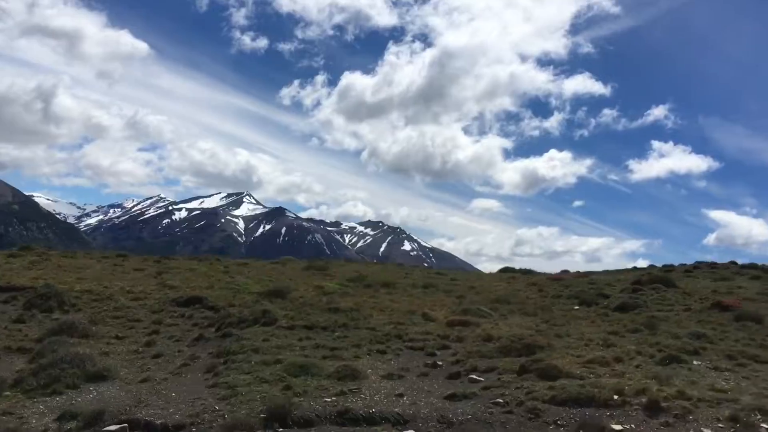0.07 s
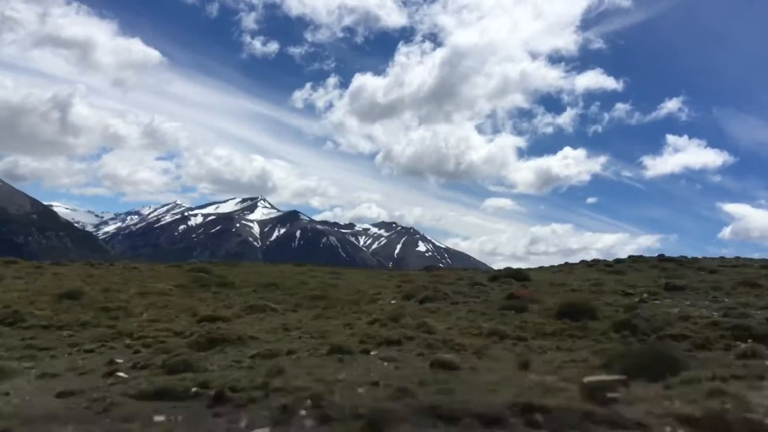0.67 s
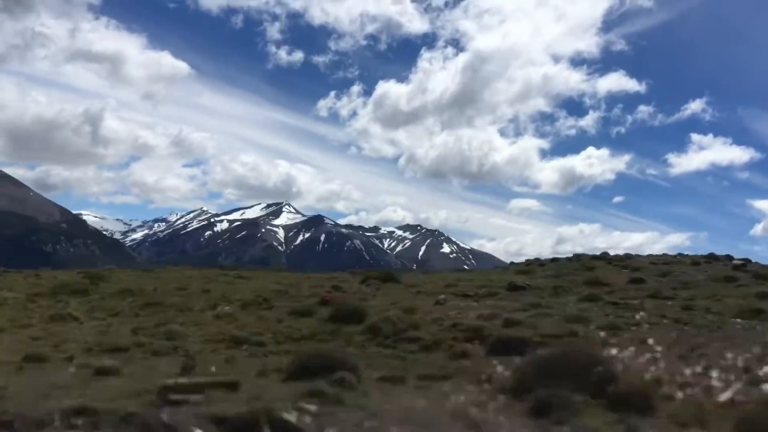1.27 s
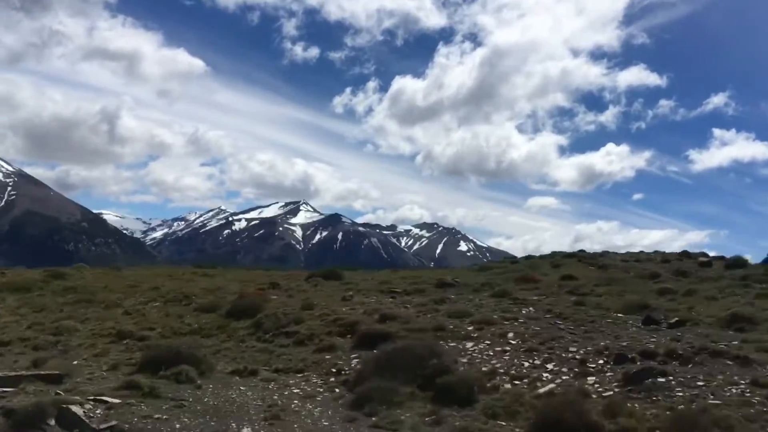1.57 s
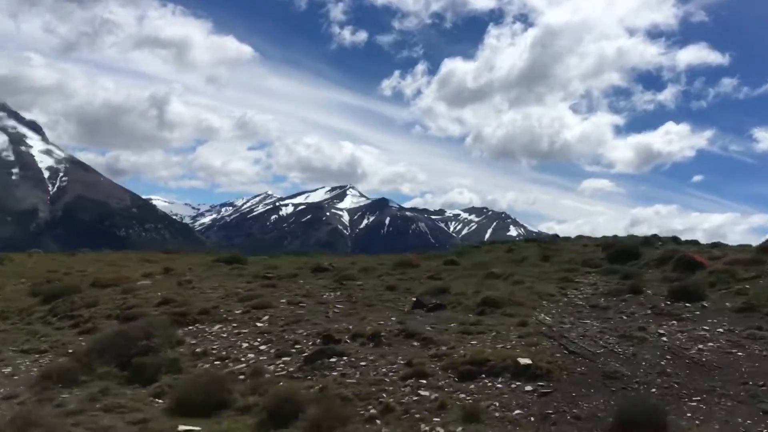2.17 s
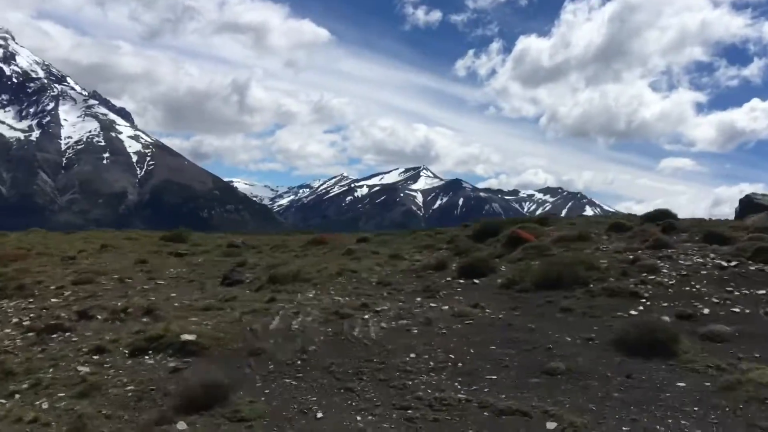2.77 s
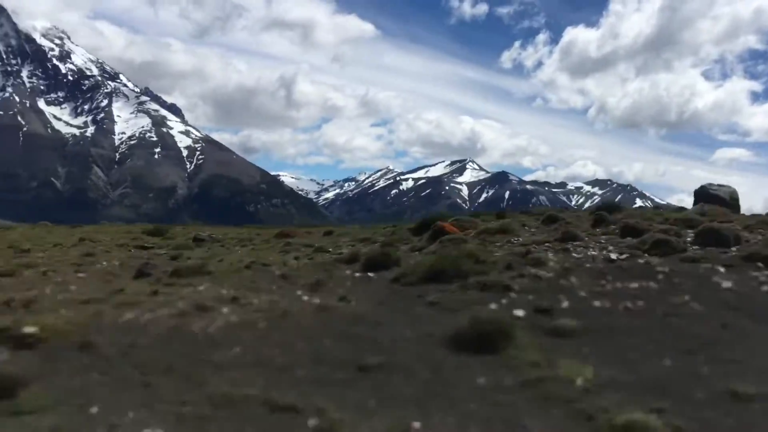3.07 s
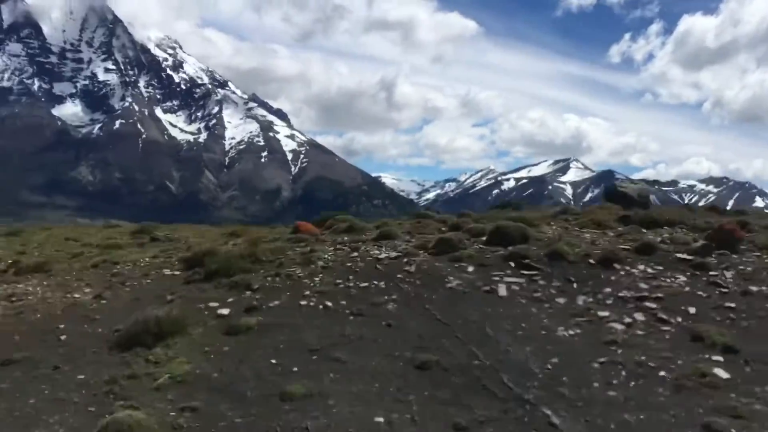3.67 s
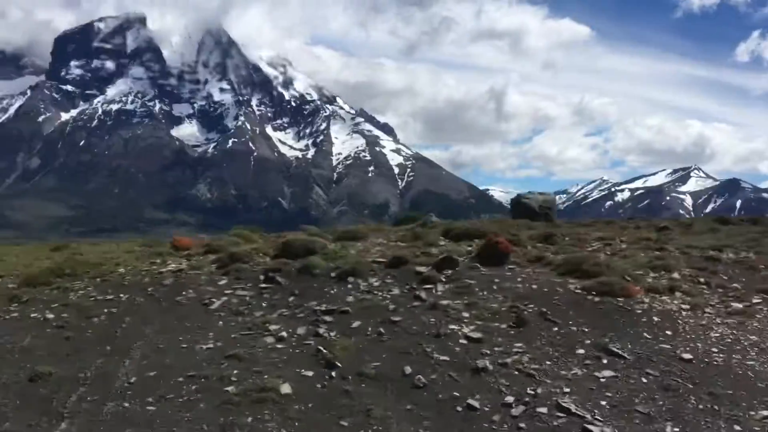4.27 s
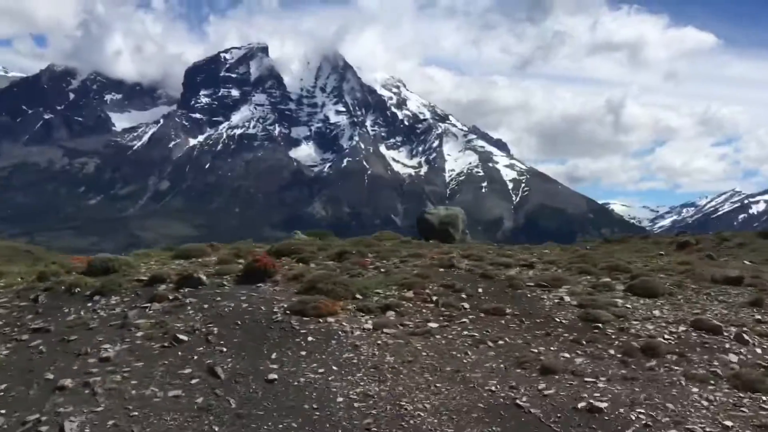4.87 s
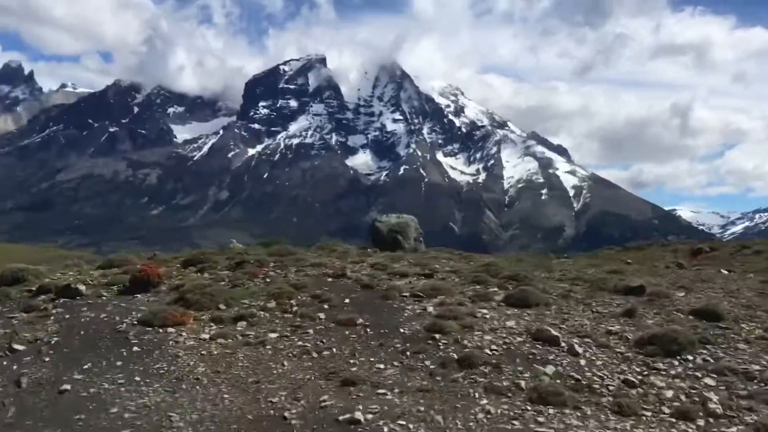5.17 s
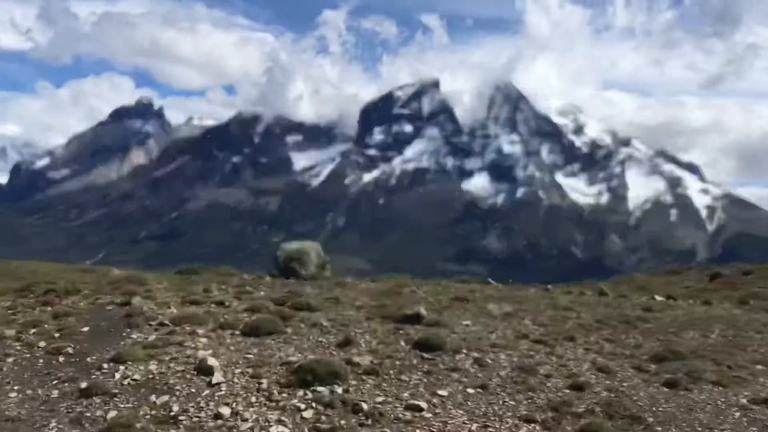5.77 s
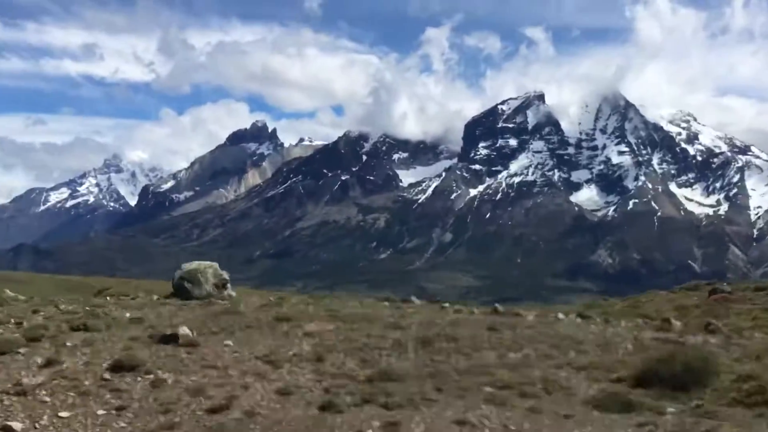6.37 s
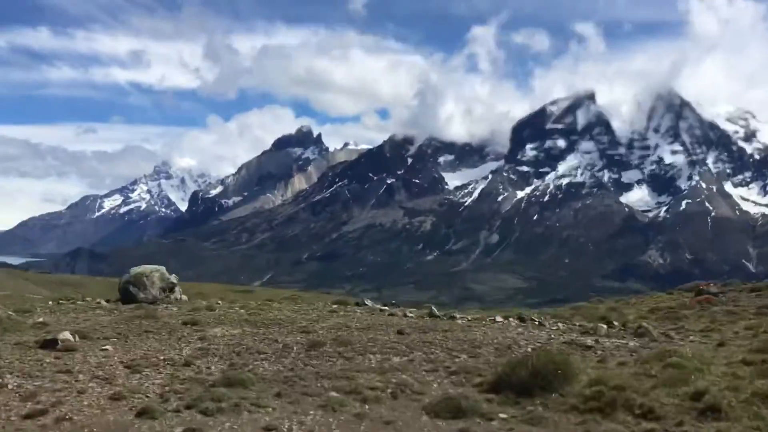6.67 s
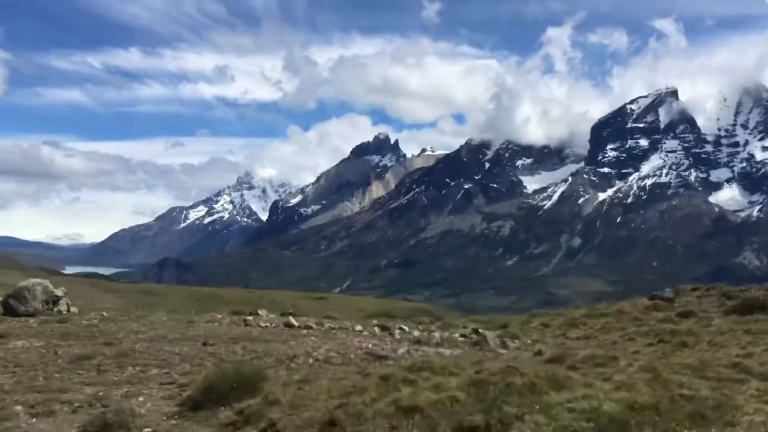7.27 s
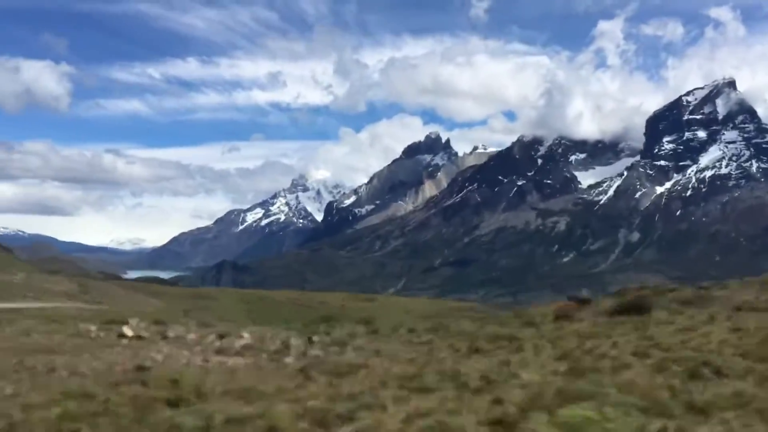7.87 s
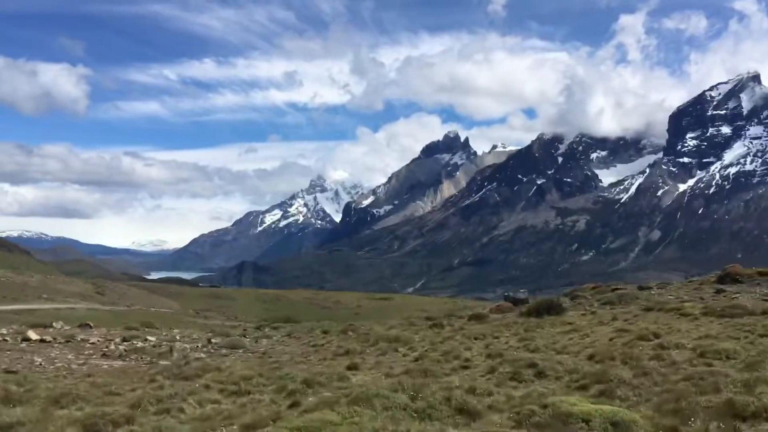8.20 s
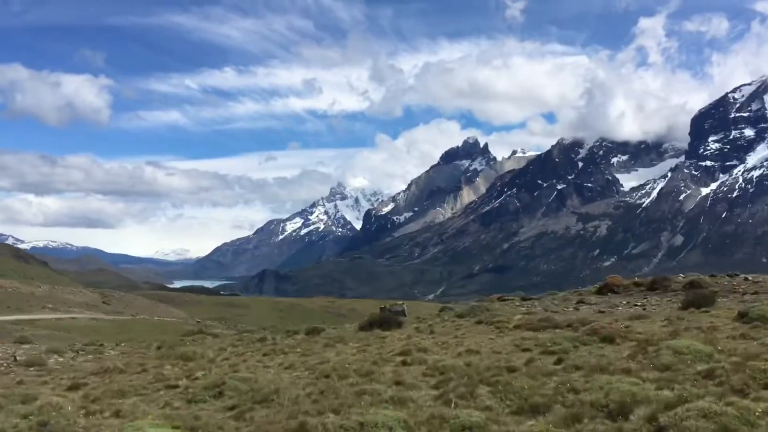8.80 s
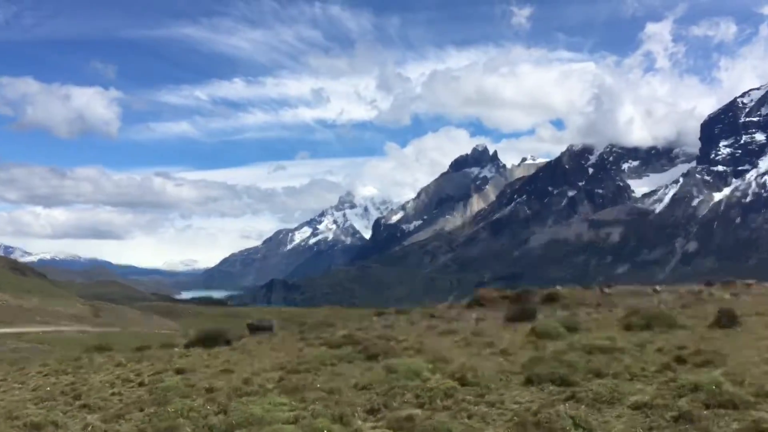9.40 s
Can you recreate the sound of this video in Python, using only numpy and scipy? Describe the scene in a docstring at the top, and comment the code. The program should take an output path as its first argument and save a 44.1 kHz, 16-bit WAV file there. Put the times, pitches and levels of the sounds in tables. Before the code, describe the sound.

From a window seat inside a moving bus, a rough stretch sets off a brief burst of loud, hollow knocks and sharp ticks from the pane. The ride then settles into deep road rumble and a slowly sinking engine drone. Tyre noise swells softly over loose gravel, while loose fittings clack, plastic trim squeaks faintly, grit ticks on the bodywork and the window gives occasional softer knocks.

```python
"""A bus on a gravel road, heard from inside, the microphone close to a side window.
A rough stretch shakes the pane into knocks and ticks, the hardest overloading the microphone. The
recording level ducks under the loud knocks, then road rumble and the slowly sinking engine drone swell
back. The low rumble throbs now and then, and loose gravel swells the tyre noise under the floor;
trim squeaks and rattles, grit flicks the body."""
import sys
import numpy as np
from scipy import signal
from scipy.fft import rfft, irfft
from scipy.io import wavfile
from scipy.ndimage import uniform_filter1d

SR = 44100
rng = np.random.default_rng(int(sys.argv[2]) if len(sys.argv) > 2 else 0)


def output_pcm(signal):
    """Save a mono or channel-first signal as 16-bit PCM at the path in sys.argv[1].

    Samples are clipped to [-1, 1] before scaling.
    """
    pcm = np.clip(np.atleast_2d(signal).T, -1, 1) * 32767
    wavfile.write(sys.argv[1], SR, np.round(pcm).astype(np.int16))


N = 425124
TIME = np.arange(N) / SR
LEAD, EARLY_S = 256, 0.0045  # an impact has LEAD samples of run-in and is mixed in EARLY_S early

# tone of the window frame, ticking or crackling: (frequency [Hz], gain [dB])
FRAME_COLOUR = [(300, -12), (1100, 3.5), (2200, -1), (3300, -0.5), (4700, -13.5), (8500, -24.5),
                (10500, -31), (14500, -19.5), (16000, -22)]


def undb(db):
    """Decibels to gain."""
    return 10 ** (np.asarray(db) / 20)


def unit(x):
    """Scale to rms 1."""
    return x / np.sqrt(np.mean(x ** 2))


def peak(x, db):
    """Scale to a peak level."""
    return x * undb(db) / np.abs(x).max()


def add(out, s, sound):
    """Mix a sound in at s seconds."""
    i = max(int(s * SR), 0)
    out[i:i + len(sound)] += sound[:N - i]


def curves(table):
    """Each column after the first, joined by straight lines in time."""
    s, *columns = np.transpose(table)
    return [np.interp(TIME, s, column) for column in columns]


def release(s, decay_s):
    """Gain that holds at 1 until s and then dies away."""
    return np.exp(-np.maximum(TIME - s, 0) / decay_s)


def freqs(size):
    """Frequencies of the spectrum of a sound of this length."""
    return np.maximum(np.fft.rfftfreq(size, 1 / SR), 1)


def colour(x, points, resonances=()):
    """Filter by an outline (frequency [Hz], gain [dB]) and peaks (centre [Hz], width [Hz], gain [dB])."""
    f, (hz, db) = freqs(len(x)), np.transpose(points)
    outline_db = np.interp(np.log(f), np.log(hz), db)
    peaks_db = sum(gain / (1 + (2 * (f - centre) / width) ** 2) for centre, width, gain in resonances)
    return irfft(rfft(x) * undb(outline_db + peaks_db), len(x))


def band(x, lo_hz, hi_hz):
    """Band-pass with steep skirts."""
    f = freqs(len(x))
    return irfft(rfft(x) / (1 + (lo_hz / f) ** 10) / (1 + (f / hi_hz) ** 10), len(x))


def walk(rate):
    """Random levels held 1 / rate seconds and smoothed twice; rms 1."""
    hold = int(SR / rate)
    steps = np.repeat(rng.standard_normal(N // hold + 1), hold)
    return unit(uniform_filter1d(uniform_filter1d(steps, hold), hold)[:N])


def tail(t60, size=16384):
    """Noise of energy 1 that dies away."""
    ring = rng.standard_normal(size) * np.exp(-np.log(1000) * np.arange(size) / SR / t60)
    return ring / np.linalg.norm(ring)


def click(ring_db, t60, size=4096):
    """A sharp contact and its brief scatter."""
    burst = undb(ring_db) * tail(t60, size) + signal.unit_impulse(size)
    return np.roll(burst, LEAD)


def patter(rate, spread_db, t60):
    """Random small impacts, a few much harder than the rest, each with its own short scatter."""
    hits = rng.random(N) < rate / SR
    force = undb(spread_db * np.minimum(rng.exponential(size=N), np.pi))
    decay = np.exp(-2 * np.log(1000) / (t60 * SR))
    energy = signal.lfilter([1], [1, -decay], (hits * force) ** 2 + 1e-18)
    return unit(np.sqrt(energy) * rng.standard_normal(N))


def shaking(end_s=0.775, settle_s=0.064, release_s=0.0032):
    """On the rough stretch the window shudders, chafes and crackles in its seal, then settles."""
    # tone of the shaken window: (frequency [Hz], gain [dB])
    shake_colour = [(12, -36), (20, -3), (61, 1.5), (120, -8), (198, -12), (293, -14), (347, -35),
                    (422, -26), (698, -24.5), (1330, -30.5), (1530, -29.5), (1860, -37), (3250, -40.5),
                    (9950, -71), (16000, -62)]
    resonances = [(500, 180, 5), (2480, 750, 1.5), (3360, 900, 4.5), (5060, 1300, -4), (7500, 3000, -3.5)]
    chafe = colour(rng.standard_normal(N), shake_colour, resonances)
    crackle = colour(patter(rate=170, spread_db=3.5, t60=0.003), FRAME_COLOUR)
    grip = undb(1.5 * walk(40))
    shudder = unit(band(chafe, 13, 405)) * undb(-18.5)
    rasp = (unit(band(chafe, 360, 16000)) * grip + undb(-4) * crackle) * undb(-41.5)
    settling = undb(-8) * release(end_s + settle_s, release_s)
    return (shudder + rasp) * np.maximum(release(end_s, release_s), settling)


def knocks(lag_cycles=0.621, panel_db=-19.5, cabin_db=-13):
    """The pane hits its frame; high bending waves run faster, so each knock sweeps from crack to thud."""
    # blows of the pane: (time [s], midrange peak [dB], thud [dB], brightness [dB])
    blows = [(0.01, -14.5, 8, -15), (0.158, -9, 5.5, -3), (0.242, -16.5, 11, -22),
             (0.283, -18.5, 11.5, -21), (0.321, -18, 7.5, -17), (0.479, -13, 7.5, -16),
             (0.6042, -1.5, 2, 0), (0.6483, -8, 5, -8), (0.7202, -.5, 5, 6.5), (0.756, -22.5, 10, -34),
             (0.7818, -22, 5, -19), (2.545, -34, 4, -17), (3.18, -26.5, -8, -17), (4.26, -32, 7, -12),
             (4.274, -24.5, 10, -10), (4.698, -32.5, -2, -15), (4.875, -29, 1, -18), (5.217, -26.5, 3, -7),
             (5.498, -31.5, 3, -13), (5.581, -23, -3, 0), (5.989, -25.5, -2, -16), (6.05, -28, -6, -8),
             (6.122, -23, 2, -9), (6.253, -17.5, 2, 3.5), (6.553, -23, 1, 1), (7.914, -27.5, 6, -4),
             (8.67, -30.5, 5, -12)]
    # tone of the pane: (frequency [Hz], gain [dB])
    pane_colour = [(20, -18), (65, 2), (125, -2.5), (210, -4.5), (350, -14), (560, -13.5), (850, -20),
                   (1200, -17), (1750, -26), (2700, -36), (3500, -35), (5000, -61), (16000, -88)]
    cabin_colour = [(90, -29.5), (180, 3), (1200, -3), (2000, -13), (4000, -26)]
    out, size = np.zeros(N), SR // 10
    phase_lag = 2 * np.pi * lag_cycles * np.log(freqs(16384) / 51)
    sweep = colour(np.roll(irfft(np.exp(-1j * phase_lag)), LEAD), pane_colour)
    rise = np.minimum(np.arange(size) / LEAD, 1)
    for s, db, thud_db, bright_db in blows:
        blow = colour(sweep, [(220, thud_db), (500, 0), (1200, 0.003), (2400, bright_db)])[:size] * rise
        blow *= undb(db) / np.abs(band(blow, 492, 2200)).max()
        cabin = colour(tail(t60=0.097), cabin_colour, [(600, 140, 8.6), (1750, 630, 4.1)])
        add(out, s - EARLY_S, blow)
        # the panel and the cabin ring hollow just after the blow
        add(out, s + 0.00405, undb(db + panel_db + thud_db / 2) * panel())
        add(out, s + 0.00194, undb(cabin_db) * signal.fftconvolve(blow, cabin[:SR // 4]))
    return out


def panel(detune_share=0.028):
    """The wall panel under the window rings after a knock, a little differently each time."""
    # hollow modes of the panel: (frequency [Hz], relative level [dB], t60 [s])
    modes = [(182, -5, 0.2), (332.5, -4, .13), (399, -4.5, 0.17), (614.5, -1, 0.066), (755, -10.5, 0.086),
             (1195, -12.5, 0.029)]
    t = np.arange(SR // 5) / SR
    detune = 1 + detune_share * rng.standard_normal(len(modes))
    return sum((-1) ** k * undb(db - 60 * t / t60) * np.sin(2 * np.pi * hz * detune[k] * t)
               for k, (hz, db, t60) in enumerate(modes))


def ticks():
    """The window frame ticks sharply between the knocks, close to the microphone."""
    # contacts in the frame: (time [s], peak [dB], body [dB], top end [dB])
    contacts = [(0.0132, -20, -10, -1), (0.032, -25, -13, 1), (0.045, -21, -7, 1), (0.101, -24, -3, 1),
                (0.147, -16.5, -13, -1), (0.232, -12.5, 5, 5), (0.2387, -19, -8, 0), (0.265, -13.5, 7, -8),
                (0.2673, -18.5, -8, -1), (0.305, -18, -2, -4), (0.311, -17.5, -2, -4), (0.359, -20.5, 6, 0),
                (0.4733, -12.5, 7.5, -2), (0.5503, -17.5, -5, 0), (0.576, -21, -6, -2),
                (0.5814, -16, -14, -6), (0.5942, -11, 0, 5), (0.6439, -17.5, -11, -2), (0.6721, -10, -5, 0),
                (0.6831, -18, -7, -7), (0.6968, -17, -2, -8), (0.7234, -4, 4, 7), (0.729, -18, -6, 2),
                (0.7406, -13.5, -18, -2), (0.749, -23, -12, -4), (0.77, -23, -11, -1)]
    out = np.zeros(N)
    for s, db, body_db, top_db in contacts:
        tick = colour(click(ring_db=-3, t60=0.008), FRAME_COLOUR)
        tick = colour(tick, [(1700, body_db), (3000, 0), (4000, 0), (9000, top_db)])
        add(out, s - EARLY_S, peak(tick, db))
    return out


def squeaks(length_s=0.035, wobble_share=0.014, grip_db=3, glide_share=0.025):
    """Plastic trim catches and slips: a short uneven chirp that bends in pitch, with a dry scrape."""
    # slips: (time [s], level [dB], pitch [Hz], step per overtone [dB], scrape re the tone [dB])
    slips = [(0.496, -38.5, 3300, -25, -9), (0.822, -47, 3500, -27.5, -20), (1.493, -46, 3040, -3.5, -6),
             (1.612, -50, 3580, -7, -8), (1.698, -52.5, 3540, -15.5, -5), (1.82, -46, 3450, -18, -6),
             (2.052, -50, 3230, -11, -2), (2.154, -53, 6250, -17, -1), (2.35, -51, 3410, -14, 3),
             (2.402, -50, 4470, -22, -6), (3.672, -48.5, 6030, -20, -3), (3.935, -53, 4320, -4, -3),
             (4.351, -48, 3300, -21, -5), (4.554, -53, 4420, -8, -12), (6.315, -48, 4560, -10, -10),
             (6.32, -38, 1150, -24, -24), (6.41, -45.5, 3904, -23, -15), (7.039, -48.5, 4273, -9, 1),
             (7.151, -54.5, 4500, -20, -1), (7.557, -56, 5170, -20, -9), (7.932, -54, 5860, -18, -13),
             (9.123, -57, 5500, -20, -11)]
    scrape_colour = [(1500, -18), (3500, 10), (9000, -12), (16000, -11)]
    out, size = np.zeros(N), int(length_s * SR)
    along = np.linspace(0, 1, size)
    swell = np.sin(np.pi * along ** 0.42) ** 2
    wobble = 1 + wobble_share * walk(500)
    grip = unit(undb(grip_db * walk(450)))
    for (s, db, hz, overtone_db, scrape_db), bend in zip(slips, rng.uniform(-1, 1, len(slips))):
        now = slice(int(s * SR), int(s * SR) + size)
        phase = 2 * np.pi * np.cumsum(hz * (wobble[now] + glide_share * bend * along)) / SR
        tone = sum(undb(overtone_db * k) * np.sin((k + 1) * phase) for k in range(int(13000 / hz)))
        scrape = unit(colour(rng.standard_normal(SR // 10), scrape_colour, [(hz, 1200, 8)]))[:size]
        add(out, s, undb(db) * swell * grip[now] * (tone + undb(scrape_db) * scrape))
    return out


def level_recovery(until_s=0.85, recover_s=0.7, dip_s=0.888, dip_width_s=0.042):
    """Recording level of engine and road: ducked under the loud knocks, it dips, then swells back."""
    duck_db = -20 * release(until_s, recover_s)
    dip_db = -1.5 * np.exp(-np.abs((TIME - dip_s) / dip_width_s) ** 4)
    return undb(duck_db + dip_db)


def engine():
    """The low firing orders boom in the cabin; the fifth to seventh sing roughly in the panels."""
    # the engine speeds up, eases off, then slows gently: (time [s], firing rate [Hz])
    speed = [(1.6, 56), (2.05, 60.77), (2.6, 59.65), (3.3, 53.05), (4.6, 50.47), (5, 52.49), (5.9, 54.23),
             (6.9, 53.74), (8.3, 52.75), (9.64, 51.3)]
    # its drone at the window seat: (time [s], boom [dB], song [dB])
    levels = [(1.6, -23, -44), (2.15, -27, -36), (3.2, -21, -47), (3.65, -24, -35), (4.25, -18.5, -36.5),
              (5.9, -20, -43), (6.8, -20.5, -34), (8.85, -21.5, -32.5), (9.02, -22, -48), (9.2, -21, -34.5),
              (9.64, -20.5, -35.5)]
    # weaker low orders: (multiple of the firing rate, level re the fundamental [dB])
    low_orders = [(2, -16.5), (3, -20), (4, -31.5)]
    # orders that the panels sing: (multiple of the firing rate, level re the song [dB])
    song_orders = [(5, -0.5), (6, -15.5), (7, -18)]
    (hz,), (boom_db, song_db) = curves(speed), curves(levels)
    phase = 2 * np.pi * np.cumsum(hz * (1 + 0.004 * walk(6))) / SR
    weak = sum(undb(db + 4.1 * walk(7.6)) * np.sin(k * phase + 0.94 * walk(15)) for k, db in low_orders)
    boom = undb(boom_db + 1.6 * walk(6.6)) * (np.sin(phase) + weak)
    song = sum(undb(db + 2.1 * walk(24)) * np.sin(k * phase + 0.4 * walk(40)) for k, db in song_orders)
    return np.sqrt(2) * (boom + undb(song_db) * song)


def road():
    """Tyres shake the body and its panels; crunching gravel comes through above them, in jolts."""
    # how hard the road drives tyres and body: (time [s], drive [dB])
    drive = [(1.9, 5), (2.7, 0.5), (4.2, 1), (4.85, -0.85), (5.4, 0.5), (6.3, -0.5), (7.2, -1.5),
             (9.64, -4)]
    # resonances of the cabin and its panels: (centre [Hz], width [Hz], gain [dB])
    cabin = [(56, 9.9, -3.5), (74.4, 15, 3.5), (179.5, 27, 3.5), (236.5, 22, -4), (261, 15, -0.5),
             (346, 22, 6), (477, 83, 0), (576, 31, 2.5), (668, 36, 4), (815, 150, 2), (980, 240, 2.5),
             (1850, 270, -0.5), (4200, 510, 5), (4980, 340, -5), (10460, 480, -6), (12600, 2500, -1.5),
             (1160, 140, 0.5), (1580, 110, 2)]
    # tone of the shaken body: (frequency [Hz], gain [dB])
    body_colour = [(12, -39), (20, -11.5), (40, 2), (64, 5), (107, -12), (174, -18.5), (215, -24),
                   (263, -17.5), (299, -28), (397, -35), (600, -30.5), (780, -78), (1320, -120)]
    # tone of gravel under the tyres: (frequency [Hz], gain [dB])
    gravel_colour = [(210, -30.5), (350, -16), (398, -6.5), (584, -8.5), (754, -13), (1090, -14),
                     (1940, -24), (3130, -22), (3390, -23), (4380, -31), (4980, -30), (6030, -28.5),
                     (10400, -45), (12400, -45.5), (16000, -44)]
    (drive_db,), loose_db, jolt = curves(drive), loose_gravel(), walk(30)
    body = colour(rng.standard_normal(N), body_colour, cabin)
    tread = patter(rate=110, spread_db=2.8, t60=0.025)
    tyres = colour(rng.standard_normal(N) + undb(-3.5) * tread, gravel_colour, cabin)
    # a jolt throws up stones in a cluster
    stones = unit(patter(rate=210, spread_db=3.2, t60=0.007) * undb(1.5 * jolt))
    gravel = undb(-2) * stones + undb(-5) * fine_gravel()
    crunch = colour(rng.standard_normal(N) + gravel, gravel_colour, cabin)
    # each layer answers the road, the loose gravel and the jolts to its own degree
    rumble = unit(band(body, 36.6, 95.3)) * undb(-19 + 0.96 * drive_db)
    drone = unit(band(body, 96, 466)) * undb(-27.5 + 0.9 * drive_db + 0.28 * loose_db + 0.53 * jolt)
    roar = unit(band(tyres, 392, 2440)) * undb(-45 + drive_db + 0.86 * loose_db + 0.91 * jolt)
    hiss = unit(band(crunch, 1870, 7500)) * undb(-60.5 + 0.96 * drive_db + loose_db + 1.16 * jolt)
    fizz = unit(band(crunch, 9040, 16100)) * undb(-66 + 0.83 * drive_db + 0.61 * loose_db + 0.44 * jolt)
    return rumble + drone + roar + hiss + fizz


def fine_gravel(count=7000, lo_hz=3000, hi_hz=13500, cycles=5, spread_db=5):
    """Fine gravel tinkles under the body, each grain ringing a few cycles at its own pitch."""
    out, t = np.zeros(N), np.arange(SR // 80) / SR
    for when, pitch, softness in rng.random((count, 3)):
        hz = lo_hz * (hi_hz / lo_hz) ** pitch
        strength = hz * undb(-spread_db * np.log(softness + 0.03))
        add(out, when * TIME[-1], strength * np.sin(2 * np.pi * hz * t) * np.exp(-t * hz / cycles))
    return unit(out)


def grit():
    """Grit flicks against the bodywork: a bright strike with a short spray."""
    # the hardest flicks: (time [s], peak [dB], resonance [Hz], top end [dB])
    flicks = [(0.979, -41.5, 6000, -21), (2.435, -39, 5800, -13), (3.168, -36, 6700, -15),
              (4.2621, -31, 10500, -9), (4.266, -29, 8600, -10), (4.3246, -36, 15000, 2),
              (4.87, -40, 4200, -20), (5.291, -36, 8800, -6), (5.388, -24.5, 4100, 4),
              (6.146, -38, 5600, -12), (6.232, -42, 5600, -14), (6.2761, -35, 5840, -8),
              (6.286, -31, 3900, -7), (8.0322, -25, 12500, -1), (8.049, -33, 12700, -2),
              (8.077, -37, 7000, -16), (8.3808, -27, 8980, -5), (8.387, -31, 7000, -3),
              (8.5066, -34, 4220, -11), (8.764, -37, 7000, 1), (8.8023, -28.5, 5940, -13),
              (8.807, -29, 6500, -6)]
    # tone of a flick: (frequency [Hz], gain [dB])
    flick_colour = [(1500, -12), (4500, -7), (6200, -1), (8000, -5), (12000, 2.5), (16000, -8)]
    out = np.zeros(N)
    for s, db, hz, top_db in flicks:
        strike = click(ring_db=2, t60=0.007)
        spray = undb(-1.5) * np.roll(tail(t60=0.055, size=len(strike)), LEAD)
        flick = colour(strike + spray, flick_colour, [(hz, 2500, 8)])
        flick = colour(flick, [(8000, 0), (14000, top_db)])
        add(out, s - EARLY_S, peak(flick, db))
    return out


def loose_gravel(attack_s=0.026, release_s=0.12):
    """Swell in dB: it rises as the wheels enter loose gravel, holds, and dies away behind them."""
    # patches under the wheels: (time [s], length [s], swell of the hiss [dB])
    patches = [(1.475, 0.018, 3), (1.68, 0.11, 3.5), (2.3, 0.25, 1.5), (2.917, 0.12, 1),
               (3.177, 0.067, 1.5), (3.603, 0.14, 2.5), (4.32, 0.025, 5.5), (4.411, .02, 0),
               (5.04, 0.056, 4.5), (5.376, 0.077, 3.5), (6.013, 0.099, 6), (6.246, 0.14, 1),
               (6.547, 0.062, 3), (7.02, 0.035, 1.5), (7.36, 0.03, 6.5), (7.845, .13, 4),
               (8.511, 0.25, 2.5), (9.368, 0.059, 2)]
    return sum(db * np.clip((TIME - s) / attack_s + 1, 0, 1) * release(s + length_s, release_s)
               for s, length_s, db in patches)


def low_throbs(length_s=0.17):
    """The cabin's low rumble swells briefly near 60 Hz."""
    # throbs of the cabin: (time of the crest [s], peak [dB], pitch [Hz])
    throbs = [(1.88, -12, 52.9), (2.0, -16.5, 72.4), (2.119, -12, 74), (2.359, -10.5, 61.8),
              (2.751, -13, 52.65), (3.759, -10, 57.8), (4.74, -11.5, 60.5), (5.08, -13.5, 62),
              (5.5, -10.5, 56), (5.831, -11, 57.2), (6.22, -14, 58)]
    out, t = np.zeros(N), np.arange(int(length_s * SR)) / SR
    for s, db, hz in throbs:
        boom = np.sin(2 * np.pi * (hz * t + rng.random()))
        add(out, s - length_s / 2, undb(db) * np.hanning(len(t)) * boom)
    return out


def rattles():
    """Loose fittings clatter in the cabin, each contact a short clack."""
    # clacks: (time [s], peak [dB], brightness [dB])
    clacks = [(1.955, -36, 16), (2.297, -29, 3), (2.912, -33, 11), (2.925, -31, 16), (3.004, -27, 3),
              (3.06, -33, 9), (3.204, -33, 20), (3.226, -25, 0.5), (3.268, -33.5, 14), (3.618, -35, 16),
              (3.722, -28.5, 9), (3.778, -39, 6), (4.151, -32, 8), (4.163, -30, 17), (4.255, -34, 3),
              (4.33, -30, 3), (4.679, -36, 3), (5.04, -37, 8), (5.601, -26, 8), (5.611, -26.5, 6),
              (5.62, -25.5, -7), (6.24, -33, 8), (6.325, -17.5, -18), (6.537, -30.5, -2), (7.044, -34, 10),
              (7.904, -30, 9), (7.956, -30, 0), (9.2, -36.5, 10), (9.396, -36, 7)]
    # tone of a fitting: (frequency [Hz], gain [dB])
    fitting_colour = [(400, -12), (1150, 10.5), (1600, 1), (2200, -0.5), (4000, -9.5), (6200, -14),
                      (9000, -27), (15000, -29)]
    out = np.zeros(N)
    for s, db, bright_db in clacks:
        clack = colour(click(ring_db=3, t60=0.019), fitting_colour)
        clack = colour(clack, [(1700, 0), (3500, bright_db)])
        add(out, s - EARLY_S, peak(clack, db))
    return out


def scene():
    """Everything as one microphone at the window seat picks it up."""
    ride = (engine() + road()) * level_recovery() + low_throbs()
    window = shaking() + knocks() + ticks()
    return (ride + window + rattles() + grit() + squeaks())[None]


def record(dry, top_hz=16000):
    """The hardest knocks overload the microphone; the top is cut."""
    rounded = dry / (1 + dry ** 6) ** (1 / 6)
    return signal.sosfilt(signal.ellip(8, 0.2, 70, top_hz, fs=SR, output="sos"), rounded)


dry = scene()
out = record(dry)
output_pcm(out)
```